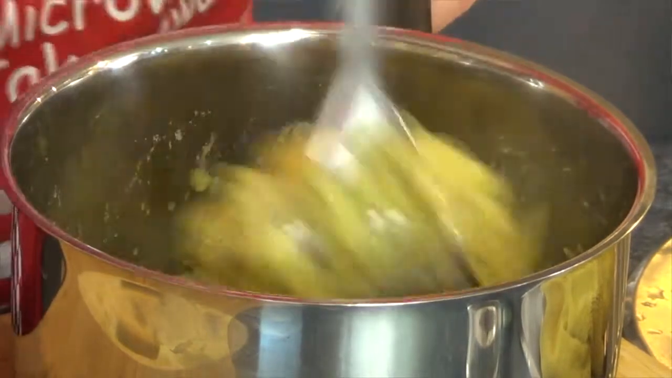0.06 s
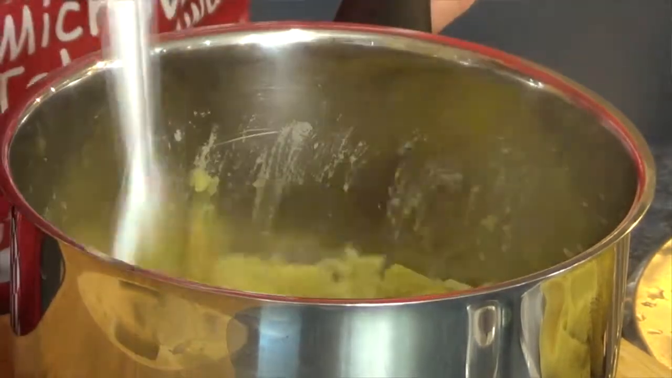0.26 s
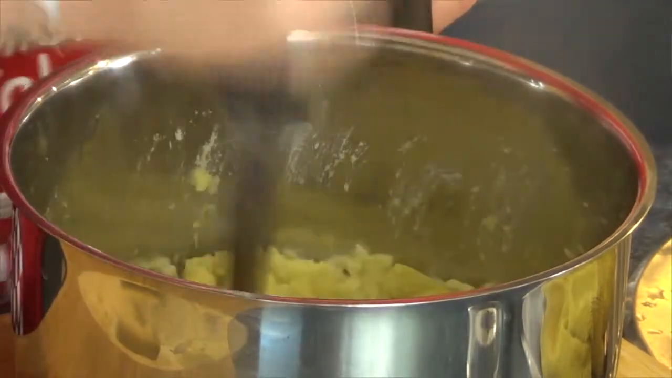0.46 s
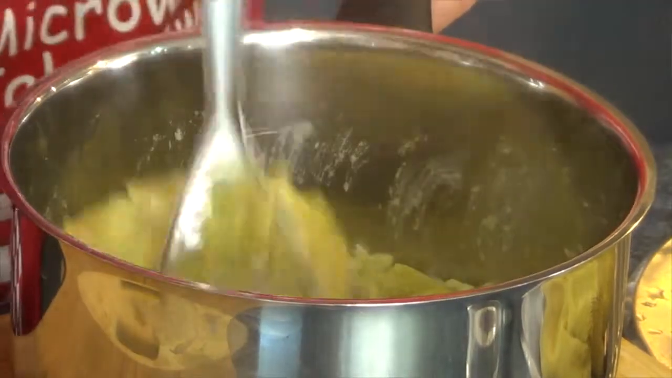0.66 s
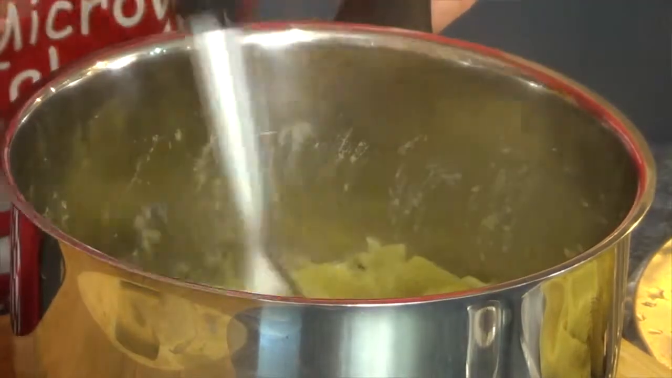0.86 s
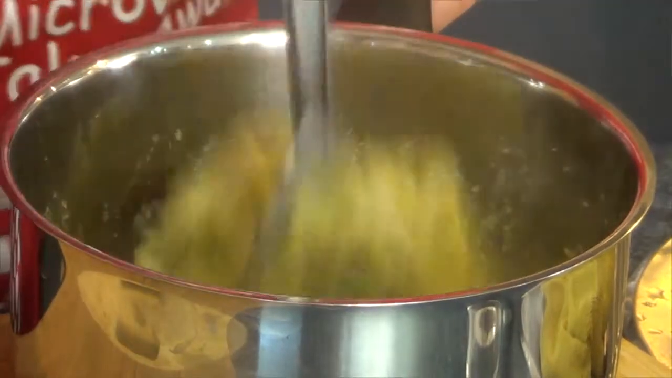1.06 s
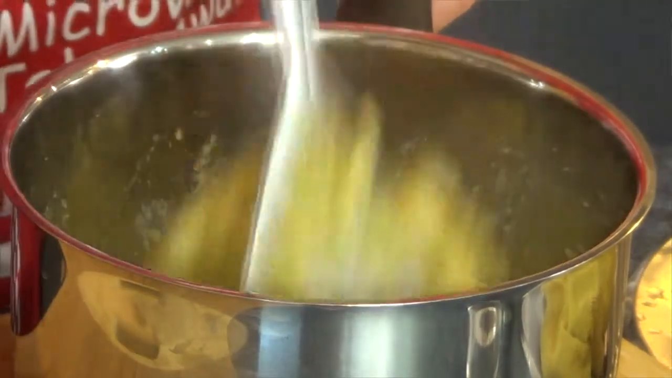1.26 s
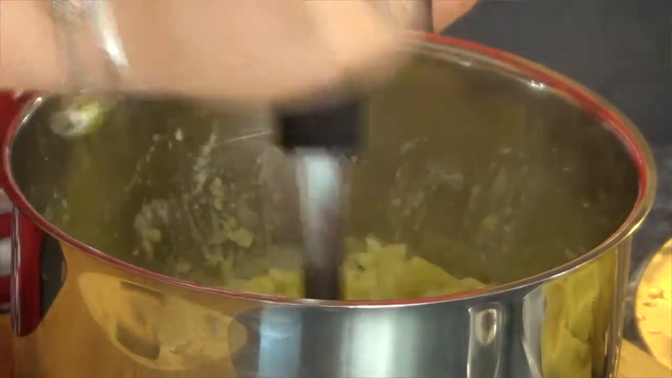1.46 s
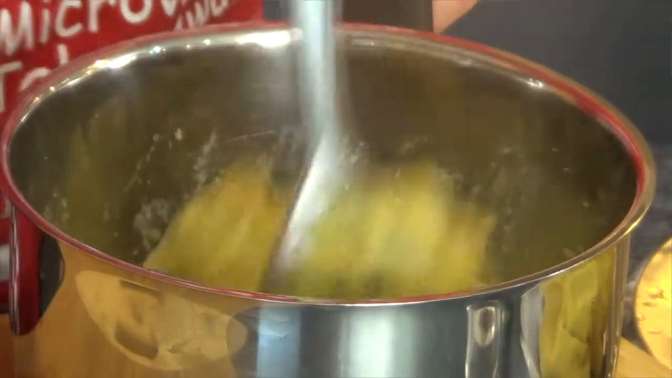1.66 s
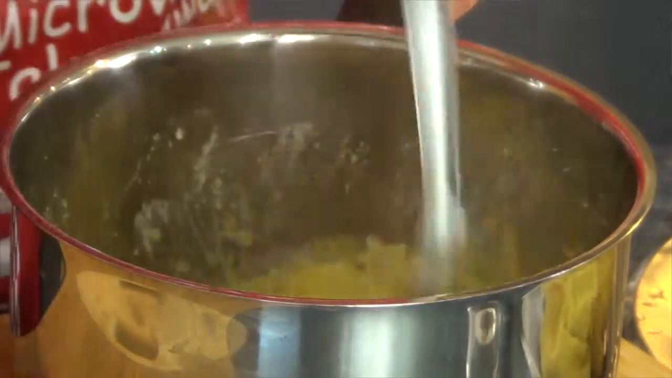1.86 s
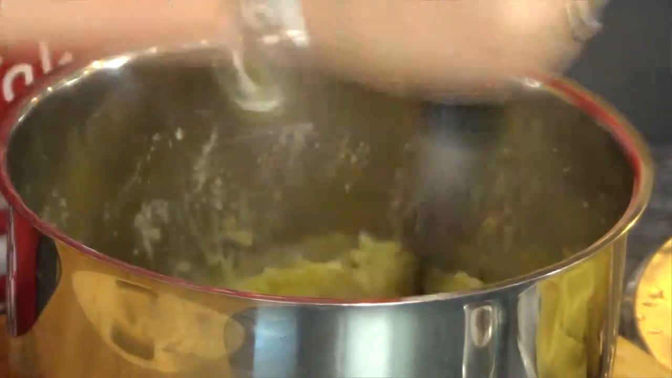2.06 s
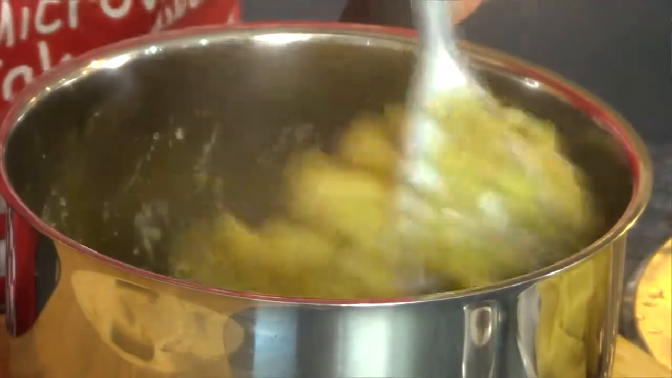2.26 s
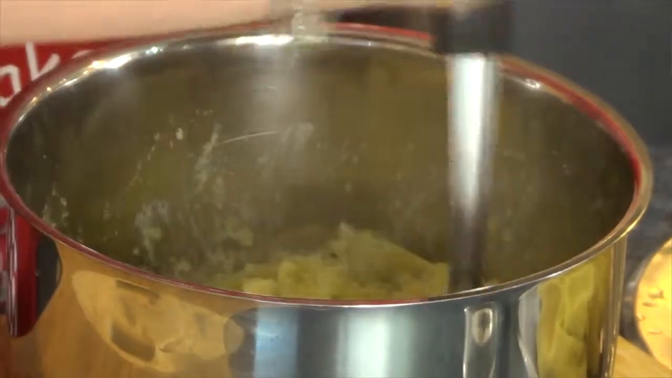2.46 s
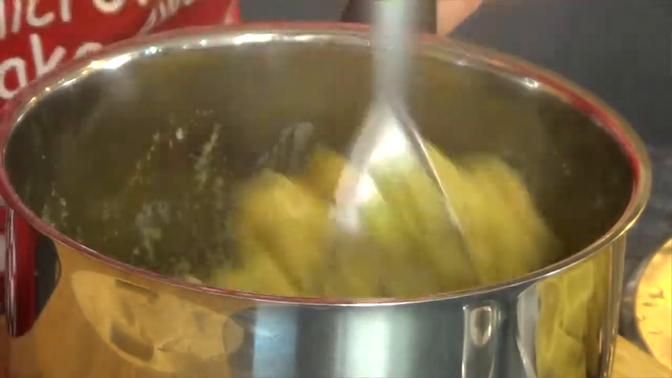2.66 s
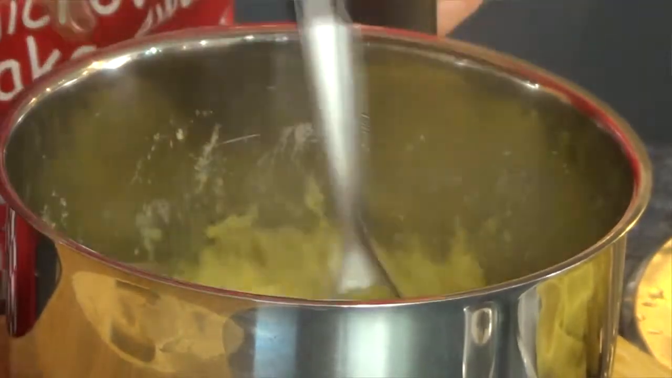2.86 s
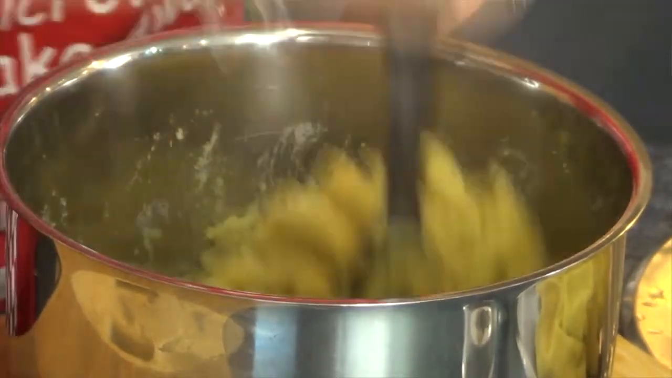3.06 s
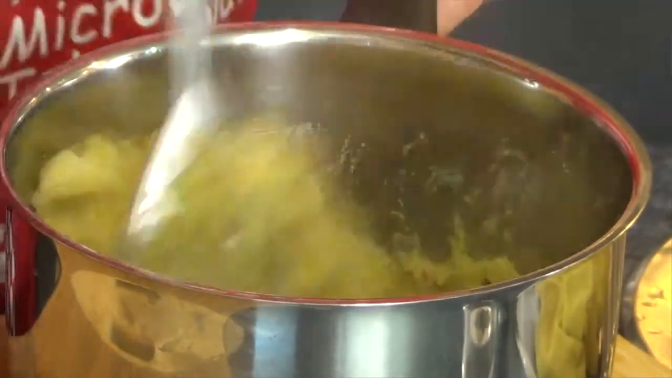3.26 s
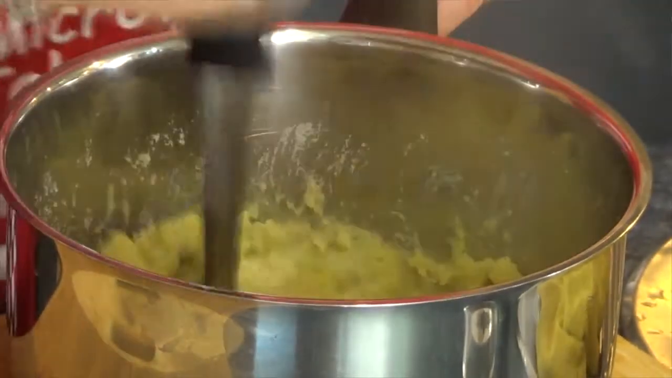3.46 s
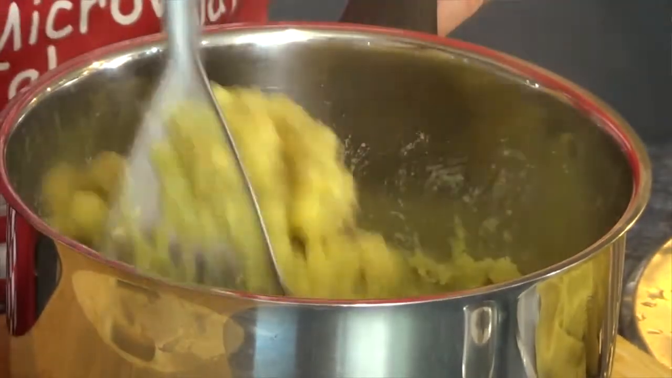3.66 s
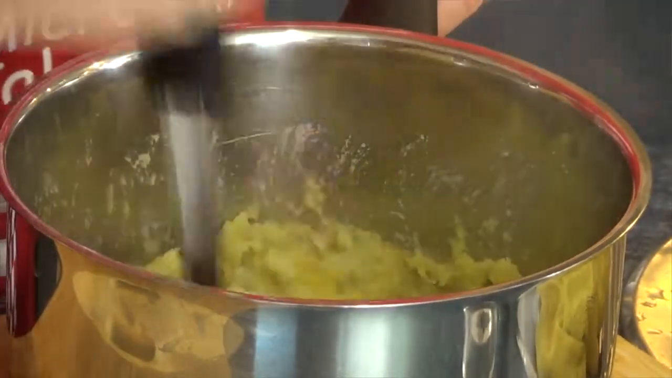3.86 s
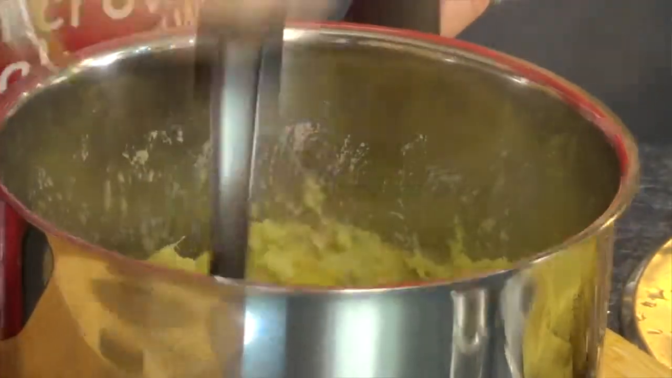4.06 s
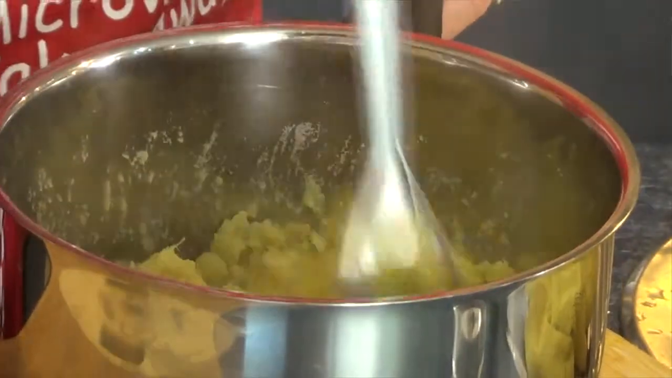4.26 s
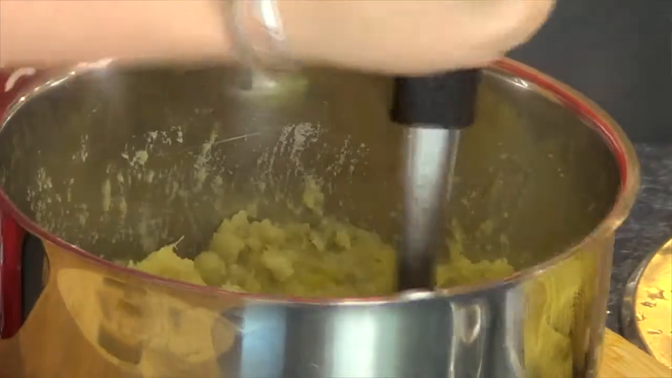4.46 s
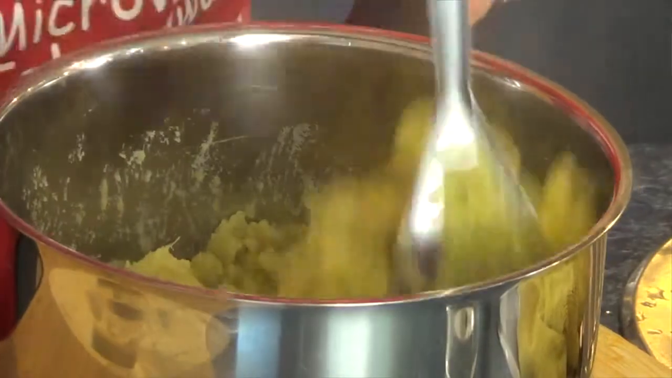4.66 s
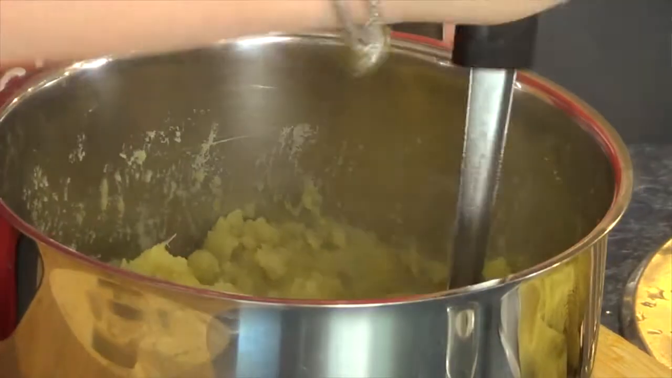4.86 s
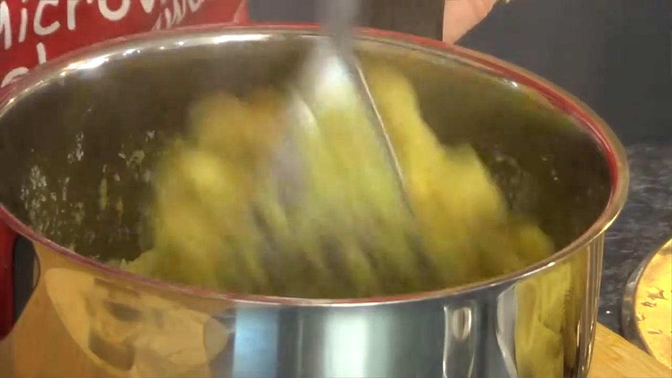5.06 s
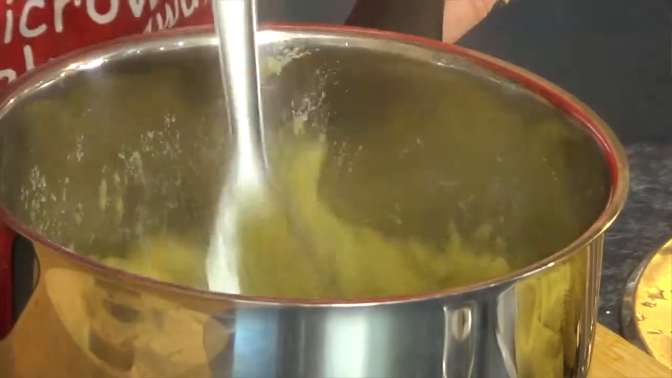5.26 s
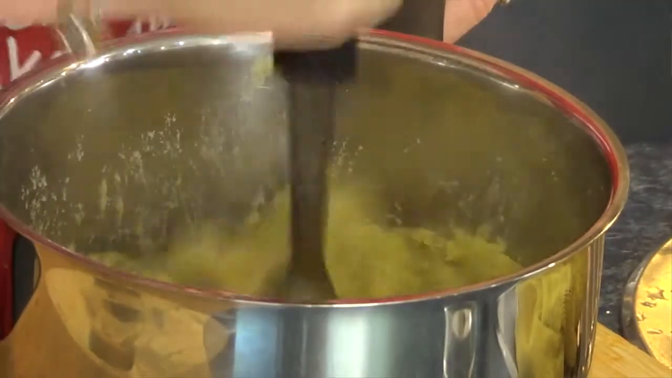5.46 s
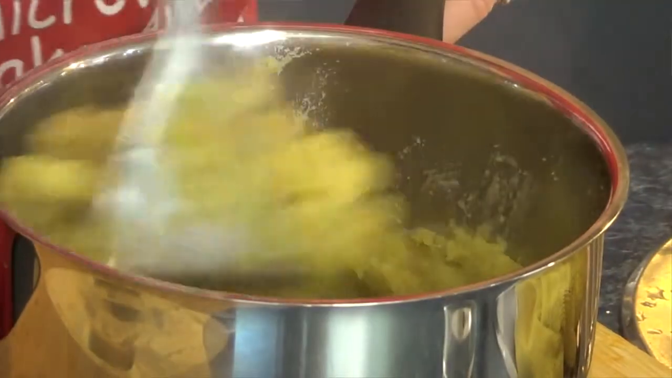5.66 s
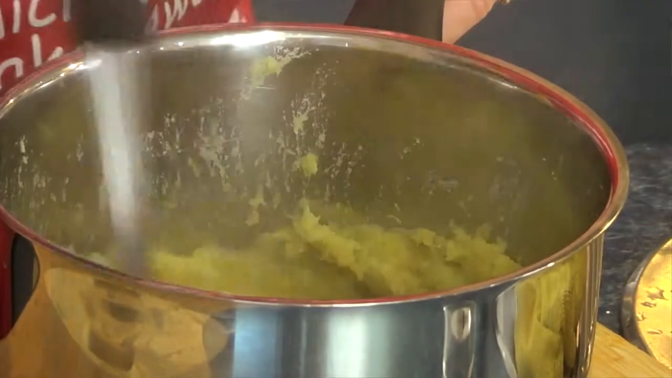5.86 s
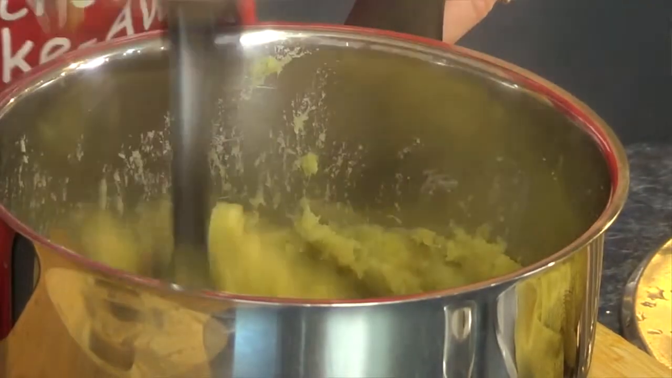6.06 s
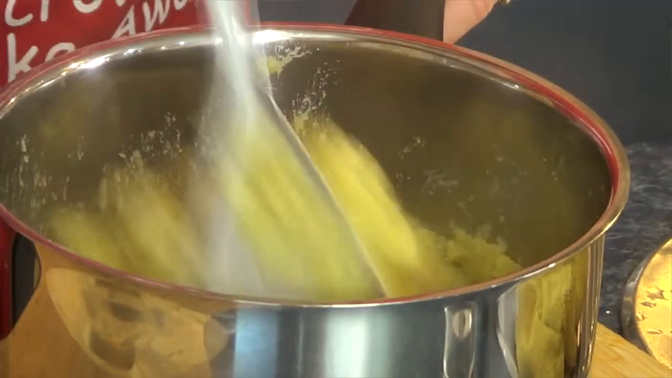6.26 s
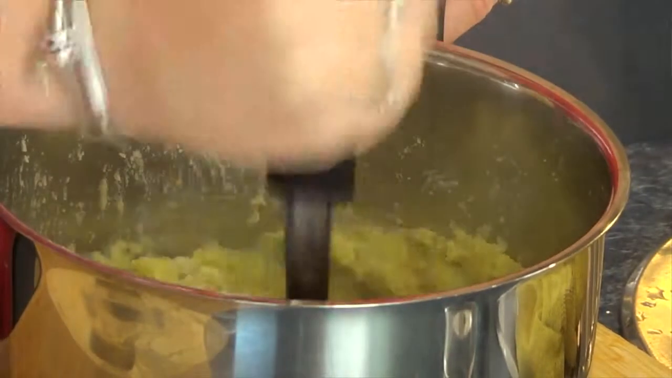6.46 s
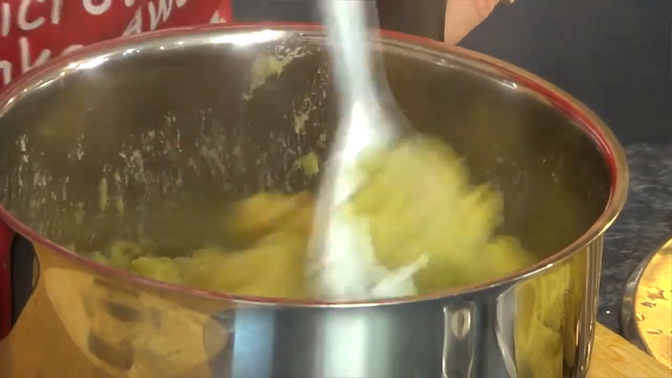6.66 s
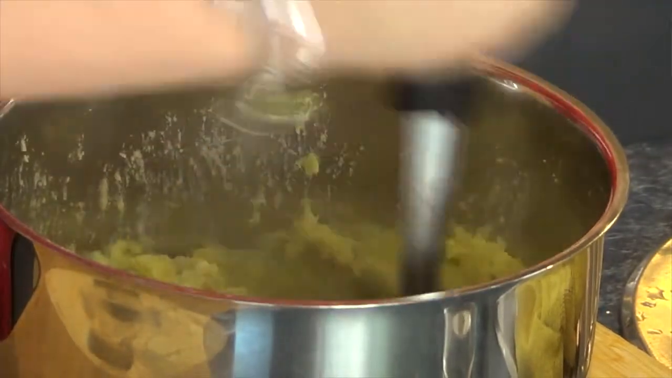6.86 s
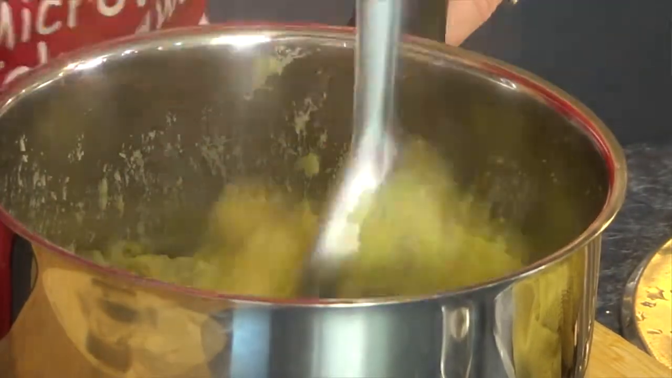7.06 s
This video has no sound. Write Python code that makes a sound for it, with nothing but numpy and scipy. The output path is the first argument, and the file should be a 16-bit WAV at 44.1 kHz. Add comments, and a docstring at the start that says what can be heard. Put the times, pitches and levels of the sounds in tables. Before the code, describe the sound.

A metal masher squishes soft boiled potato in a steel pot with wet slaps, crackles and occasional dull knocks.

```python
"""A metal masher works boiled sweet potato in a steel pot, about two strokes a second, close to one mic.
Each stroke slaps a lump onto the mash, presses it through the plate with wet crackles and air pops,
then peels off. Here and there, hardest just past midway, the masher scrapes the mash together and
knocks the pot, which thuds on its board. A small, hard kitchen rings over quiet air and a faint hum."""
import sys
import numpy as np
from scipy import signal
from scipy.fft import rfft, irfft, next_fast_len
from scipy.io import wavfile
from scipy.ndimage import uniform_filter1d

SR = 44100
rng = np.random.default_rng(int(sys.argv[2]) if len(sys.argv) > 2 else 0)


def put_to_file(sound):
    """Save the sound as 16-bit audio at rate SR, in the file named by the first command-line argument."""
    columns = np.atleast_2d(sound).T  # one column per channel
    safe = np.clip(columns, -1, 1)
    whole_steps = np.round(safe * 32767)
    wavfile.write(sys.argv[1], SR, whole_steps.astype(np.int16))


N = 313110
T = np.arange(SR * 2 // 5) / SR  # the life of one hit

# Short sideways scrapes through the mash: t/s, gurgle/dB, crackle/dB, fizz/dB
SCRAPES = [(0.005, -45.5, -68, -60), (0.055, -53, -61, -53.5), (4.424, -57, -47, -50),
           (4.608, -39, -50.5, -53), (4.865, -51.5, -51, -53), (5.048, -38.5, -51.5, -53),
           (5.354, -41, -54, -55), (5.53, -48.5, -59, -70), (6.713, -64, -69, -57.5),
           (7.095, -41.5, -51, -58.5)]
# A lump lands on the mash: t/s, plop level/dB, plop f/Hz, splash level/dB
SLAPS = [(0.324, -27, 1020, -34), (0.8647, -28.5, 945, -32), (1.358, -25.5, 634, -32.5),
         (1.8927, -28, 657, -38), (2.4021, -28, 1166, -35.5), (2.905, -37, 1520, -37),
         (3.4035, -29.5, 914, -36), (3.8434, -28, 770, -36.5), (3.9056, -32, 860, -33),
         (4.2684, -28.5, 800, -30.5), (4.7193, -23.5, 697, -27.5), (5.8363, -24.5, 680, -35),
         (6.3502, -29.5, 1880, -37.5), (6.3788, -30, 696, -34), (6.7887, -33.5, 750, -38.5)]
# Wet faces mostly close faster as the mash softens: t/s, closing time/s
CLOSING_TIMES = [(0.3, 0.0062), (2.4, 0.0055), (4.3, 0.00313), (6.8, 0.004)]
# The plate presses down: full force t/s, gurgle/dB, crackle/dB, fizz/dB, wait until peel/s, peel/dB
PRESSES = [(0.392, -48, -45.5, -49, .24, -56), (0.945, -50, -49.5, -58.5, .165, -55),
           (1.455, -45, -45, -56, 0.2, -55.5), (2.0, -49.5, -51, -56.5, 0.16, -52.5),
           (2.48, -47.5, -47, -55, .16, -55.5), (3.045, -44, -55.5, -65, 0.073, -61.5),
           (3.46, -42, -49, -59, 0.18, -58.5), (3.943, -41, -48.5, -55, .18, -59.5),
           (5.417, -45, -49.5, -63, .185, -53.5), (5.91, -42, -43.5, -49, 0.23, -54.5),
           (6.452, -43, -43.5, -46.5, 0.14, -55), (6.925, -48, -51, -53, 0.16, -61)]
# The plate knocks the pot: t/s, level/dB, f/Hz, click level/dB (both levels before trim)
KNOCKS = [(0.437, -25.5, 654, -38.5), (0.501, -26.5, 610, -40.5), (1.523, -23.5, 706, -32),
          (1.6154, -33, 397, -45.5), (2.187, -31, 609, -57), (4.209, -33.5, 382, -57),
          (4.2278, -18.5, 393, -48), (4.418, -30.5, 556, -48), (4.6648, -15, 600, -25.5),
          (4.685, -17, 400, -54), (5.0905, -18, 430, -33.5), (6.084, -37, 676, -43.5),
          (6.65, -33, 680, -55)]
# Large air pockets burst: t/s, level/dB, f/Hz, spray level/dB
POPS = [(0.4372, -40, 3600, -38.5), (1.094, -49, 5570, -46), (1.442, -36, 1040, -42),
        (1.5, -31.5, 2430, -43), (2.462, -36.5, 1180, -36), (2.509, -37.5, 2260, -62),
        (2.65, -45, 1240, -50), (2.9797, -36, 1220, -48), (3.967, -29.5, 1380, -45), (4.044, -45, 900, -44),
        (4.0855, -54, 900, -50.5), (4.1478, -43, 2560, -47), (5.2933, -38.5, 1360, -70),
        (5.4, -34.5, 2300, -52), (5.436, -41, 2840, -60), (5.937, -36, 1900, -60), (5.9563, -35, 1330, -62),
        (6.442, -34.5, 2240, -39), (6.9265, -37.5, 2720, -44)]
# The pot is pressed onto its board: t/s, level/dB before trim
THUDS = [(0.523, -39), (0.559, -40), (1.36, -43.5), (2.185, -47), (2.984, -39), (3.478, -39), (4.225, -33),
         (4.669, -24), (4.717, -36.5), (5.092, -31), (5.347, -42.5), (5.449, -41), (6.647, -42)]
# Hum of a distant appliance: f/Hz, level/dB
HUM = [(118.4, -63.5), (155, -69.5), (452, -67)]
# Resonances of the open pot: f/Hz, width/Hz, level/dB (halved in use)
POT_MODES = [(610, 51, -5), (860, 70, -6), (1067, 12, 8), (1251, 59, 9.5), (1361, 48, 13), (1814, 54, -3),
             (2100, 89, 6), (2790, 52, -42), (3400, 105, 4), (4660, 720, -13)]
# The masher's steel plate, damped by mash: f/Hz, relative level/dB
PLATE_MODES = [(2900, 0.5), (3280, -7), (4250, 3), (5800, -8), (7560, -8)]
# Standing waves of the kitchen: f/Hz, level/dB
ROOM_MODES = [(76, -16), (155, 8), (308, -26), (430, 10)]
# Reverb of the kitchen: f/Hz, t60/s
ROOM_DECAY = [(100, 1), (260, 0.49), (700, 0.43), (1840, 0.44), (4850, 0.33), (12800, 0.35)]
# EQ curves, each: f/Hz, relative level/dB
AIR_EQ = [(12, -26), (20, -16), (63, 0.5), (150, -7.5), (216, -3), (293, -14.5), (319, -8), (459, -8.5),
          (642, -14), (1910, -23), (3440, -28.5), (3740, -29.5), (6720, -28), (12800, -35), (16000, -34)]  # low room air
GURGLE_EQ = [(50, -34), (150, 9.5), (260, -1.5), (430, 2.5), (700, -0.5), (1100, -22.5), (2500, -24),
             (8000, -44)]  # thick, flowing mash
SPLASH_EQ = [(300, -31.5), (1000, 4.5), (1800, -8), (3000, 2.5), (3700, -5.5), (4400, -6), (6500, -13.5),
             (10000, -29), (16000, -14)]  # wet midrange bite
HOLLOW_EQ = [(100, -8), (300, -18.5), (450, -12.5), (680, 4), (1250, -14.5), (1800, -12.5), (4000, -44),
             (12000, -104)]  # cupped tone of plops and knocks
BODY_EQ = [(40, -7), (100, -20), (150, 8), (220, -9.5), (320, -4.5), (430, 5), (700, -28.5), (2000, -62.5)]  # low weight of a hit
SPRAY_EQ = [(1500, -79), (4000, -1), (7500, 3), (10000, -0.5), (15500, -3.5)]  # fine, bright droplets
THUD_EQ = [(20, -46), (45, -15), (75, 0), (120, -14.5), (200, -6.5), (500, -83.5)]  # boom of the board
HISS_EQ = [(100, 7.5), (600, -5.5), (2500, -4), (5000, -4), (15000, -7)]  # mic self-noise

LEAD_S = .12  # run-up to the peak of a swell


def amp(db):
    """Decibels to gain."""
    return 10 ** (np.asarray(db) / 20)


def unit(x):
    """Scale to rms 1."""
    return x / np.sqrt(np.mean(x ** 2) + 1e-20)


def along(points, hz):
    """Read a breakpoint curve on a log frequency axis."""
    f, values = np.transpose(points)
    return np.interp(np.log(hz + 1), np.log(f), values)


def eq(x, curve):
    """Minimum-phase EQ, so attacks have no pre-ring."""
    m = next_fast_len(len(x) + 4096, True)
    gain = amp(along(curve, np.fft.rfftfreq(m, 1 / SR)))
    cepstrum = irfft(np.log(gain), m)
    cepstrum[1:m // 2] *= 2
    cepstrum[m // 2 + 1:] = 0
    return irfft(rfft(x, m) * np.exp(rfft(cepstrum)), m)[:len(x)]


def add(track, s, x):
    """Mix x into the track from time s."""
    start = round(s * SR)
    x = x[max(-start, 0):]
    part = track[max(start, 0):][:len(x)]
    part += x[:len(part)]


def at_level(x, db, window=256):
    """Set the rms level of the loudest window of samples."""
    return x * amp(db) / np.sqrt(uniform_filter1d(x ** 2, window).max() + 1e-20)


def burst(t60, hold=0):
    """Noise that holds, then dies away."""
    return rng.standard_normal(len(T)) * amp(-60 * np.maximum(T - hold, 0) / t60)


def ring(hz, t60, delay=0):
    """A damped resonance."""
    t = np.maximum(T - delay, 0)
    return np.sin(2 * np.pi * hz * t) * amp(-60 * t / t60)


def room_tone():
    """The bed: quiet air and a distant appliance's hum."""
    t = np.arange(N) / SR
    hum = sum(amp(db) * unit(np.sin(2 * np.pi * hz * t + rng.uniform(0, 2 * np.pi))) for hz, db in HUM)
    return hum + amp(-54.5) * unit(eq(rng.standard_normal(N), AIR_EQ))


def squeezes():
    """Scrapes nudge the mash; presses force it through the plate, which peels off with a sticky fizz."""
    out = np.zeros(N)
    flow, tearing = swell(rise_s=.035, fall_s=.087), swell(rise_s=.035, fall_s=.039)
    peel, scrape = swell(rise_s=.041), swell(rise_s=.025)
    for s, gurgle_db, crackle_db, fizz_db, wait_s, peel_db in PRESSES:
        add(out, s - LEAD_S, ooze(flow, tearing, gurgle_db, crackle_db, fizz_db))
        lift = ooze(peel, peel, gurgle_db=peel_db - 2, crackle_db=peel_db - 8, fizz_db=peel_db)
        add(out, s + wait_s - LEAD_S, lift)
    for s, gurgle_db, crackle_db, fizz_db in SCRAPES:
        add(out, s - LEAD_S, ooze(scrape, scrape, gurgle_db, crackle_db, fizz_db))
    return out


def swell(rise_s, fall_s=None):
    """A bell of force peaking at LEAD_S, with an exponential release if a fall is given."""
    t = T - LEAD_S
    bell = np.exp(-(t / rise_s) ** 2)
    return bell if fall_s is None else np.where(t < 0, bell, np.exp(-np.abs(t) / fall_s))


def ooze(flow, tearing, gurgle_db, crackle_db, fizz_db):
    """Mash gurgles as it flows; its tearing films crackle, rush and fizz."""
    gurgle = in_pot(eq(rng.standard_normal(len(T)) * flow, GURGLE_EQ), ring_db=-31)
    crackle = bubbles(tearing, per_s=2400, hz=2160, pitch_spread=0.56, cycles=7, spread_db=8.0)
    # The rush is bubbles too many to tell apart.
    rush = in_pot(eq(rng.standard_normal(len(T)) * tearing, SPLASH_EQ), ring_db=-1)
    fizz = bubbles(tearing, per_s=3500, hz=11600, pitch_spread=0.42, cycles=10.5, spread_db=8.5)
    layers = (gurgle, gurgle_db), (crackle, crackle_db), (rush, crackle_db - 6), (fizz, fizz_db)
    return echoed(sum(at_level(layer, db, window=1536) for layer, db in layers), early_db=-7)


def in_pot(x, ring_db):
    """Blend in the ring of the open pot; ring_db is the send level."""
    m = next_fast_len(len(x) + 4096, True)
    f = np.fft.rfftfreq(m, 1 / SR)
    modes = sum(amp(db / 2) * 1j * f * width / (hz * hz - f * f + 1j * f * width)
                for hz, width, db in POT_MODES)
    return irfft(rfft(x, m) * (1 + amp(ring_db) * modes), m)[:len(x)]


def bubbles(envelope, per_s, hz, pitch_spread, cycles, spread_db, size=400):
    """Tiny bubbles burst at random under the envelope, each a pitched grain; a few are much louder."""
    onsets = np.flatnonzero((rng.random(len(T)) < per_s / SR) & (envelope > .02))
    pitch = np.minimum(hz * np.exp(pitch_spread * rng.standard_normal((len(onsets), 1))), SR * .45)
    accent_db = spread_db * np.minimum(rng.exponential(size=len(onsets)), 3)
    strength = envelope[onsets] * amp(accent_db) * rng.choice([-1, 1], len(onsets))
    turns = pitch * np.arange(size) / SR
    grains = strength[:, None] * np.sin(2 * np.pi * turns) * amp(-60 * turns / cycles)
    positions = onsets[:, None] + np.arange(size)
    return np.bincount(positions.ravel(), grains.ravel(), len(T) + size)[:len(T)]


def echoed(x, early_db):
    """Add early reflections from the pot wall and the counter."""
    early = (burst(t60=0.11) * np.minimum(T / 0.0032, 1))[:SR // 5]
    return x + signal.fftconvolve(x, amp(early_db) * early / np.linalg.norm(early))[:len(x)]


def kitchen(x, blur=0.08, size=512):
    """The room stores each band's energy and lets it die as diffuse noise; low standing waves ring on."""
    hz, t, spectrum = signal.stft(x, SR, nperseg=size)
    near = np.exp(-(np.log((hz[:, None] + 1) / (hz + 1)) / blur) ** 2)  # nearby bands share energy
    fed = (near / near.sum(axis=0)) @ np.abs(spectrum) ** 2
    kept = amp(-60 * t[1] / along(ROOM_DECAY, hz)) ** 2  # share of energy left after one frame
    stored = np.array([signal.lfilter([0, 0, 1 - k], [1, -k], band) for k, band in zip(kept, fed)])
    noise = signal.stft(rng.standard_normal(N), nperseg=size)[2]
    tail = signal.istft(noise * np.sqrt(stored / np.mean(np.abs(noise) ** 2)), nperseg=size)[1][:N]
    modes = [(ring(f, t60=1.0), db) for f, db in ROOM_MODES]
    standing = sum(amp(db) * mode / np.abs(mode).sum() for mode, db in modes)
    return eq(tail, [(40, -10.0), (130, -1.5)]) + signal.fftconvolve(x, standing)[:N]


def slaps():
    """Wet faces close in a few milliseconds of spatter; the trapped air then plops out."""
    out = np.zeros(N)
    wet_attack = np.minimum(T / 0.00088 + 0.12, 1)  # the first drops come before the rest
    for s, db, hz, splash_db in SLAPS:
        closing = np.interp(s, *np.transpose(CLOSING_TIMES))
        attack = np.minimum(T / closing + 0.4, 1)
        note = ring(hz, t60=0.037, delay=0.737 * closing)
        hollow = eq(attack * spatter(closing, t60=0.025, fizzle_db=-0.5), HOLLOW_EQ)
        plop = in_pot(at_level(note, -1) + at_level(hollow, -0.28), ring_db=8)
        thump = eq(attack * burst(t60=0.11, hold=closing), BODY_EQ)
        splash = eq(wet_attack * spatter(closing, t60=0.013, fizzle_db=-16.5), SPLASH_EQ)
        spray = eq(wet_attack * spatter(closing, t60=0.02, fizzle_db=-18), SPRAY_EQ)
        hit = at_level(plop, db) + at_level(thump, -36)
        hit += at_level(in_pot(splash, ring_db=-0.5), splash_db)
        hit += at_level(spray, splash_db - 3) + plate_ring(splash_db)
        add(out, s, echoed(hit, early_db=-7.5))
    return out


def spatter(closing, t60, fizzle_db):
    """Noise while two wet faces close, then a weaker fizzle as the contact spreads."""
    return burst(t60, hold=closing) + amp(fizzle_db) * burst(t60=0.11)


def plate_ring(contact_db):
    """The steel plate pings under the contact that excites it, favouring other modes each time."""
    scatter = rng.standard_normal((len(PLATE_MODES), 2))
    modes = sum(amp(db + 3 * louder) * ring(hz * (1 + .015 * detune), t60=0.022)
                for (hz, db), (louder, detune) in zip(PLATE_MODES, scatter))
    return at_level(modes, contact_db - 10)


def knocks(cushion_s=.0022, click_lag_s=.0012):
    """The plate pushes the pot through a cushion of mash, then strikes: a dull note and a click."""
    out = np.zeros(N)
    attack = np.minimum(T / 0.0023 + 0.42, 1)
    for s, db, hz, click_db in KNOCKS:
        hollow = eq(snap(t60=0.036, scatter_db=1.5), HOLLOW_EQ)
        note = at_level(ring(hz, t60=0.027), -0.4) + at_level(hollow, 0.28)
        strike = at_level(in_pot(note * attack, ring_db=-8.5), db - 3.5)
        click = at_level(eq(snap(t60=0.005, scatter_db=14), SPLASH_EQ), click_db + .5)
        click += plate_ring(click_db)
        push = at_level(eq(snap(t60=0.048, scatter_db=6.5), BODY_EQ), db - 7)
        add(out, s, echoed(strike, early_db=-4.5))
        add(out, s + click_lag_s, echoed(click, early_db=-10))  # the mash gives way: steel on steel
        add(out, s - cushion_s, echoed(push, early_db=-1.5))
    return out


def snap(t60, scatter_db):
    """One sharp transient with a short scatter behind it."""
    scatter = burst(t60)
    return (T == 0) + amp(scatter_db) * scatter / np.linalg.norm(scatter)


def pops():
    """Air pockets burst with a short note and a fine spray."""
    out = np.zeros(N)
    for s, db, hz, spray_db in list(POPS) + small_pops():
        crack = eq(snap(t60=0.016, scatter_db=31.0), SPLASH_EQ)
        note = at_level(ring(hz, t60=0.0043), 2.0) + at_level(crack, -0.94)
        spray = eq(burst(t60=0.024), SPRAY_EQ)
        add(out, s, echoed(at_level(note, db) + at_level(spray, spray_db), early_db=-4))
    return out


def small_pops(per_press=2, span_s=.11, db=-49, centre_hz=1600, spray_db=-52):
    """Cues for the small air pockets each press frees, at random times and pitches."""
    chance = rng.random((len(PRESSES), per_press, 2))
    return [(press[0] + span_s * late, db, centre_hz * 2 ** (2 * high - 1), spray_db)
            for press, draws in zip(PRESSES, chance) for late, high in draws]


def thuds():
    """The board under the pot gives a low, short boom."""
    out = np.zeros(N)
    for s, db in THUDS:
        push = snap(t60=0.12, scatter_db=5.5) + amp(-8) * snap(t60=0.19, scatter_db=8)
        add(out, s, at_level(eq(push, THUD_EQ), db + 3.5))
    return out


def scene():
    """A centred mono mix; slaps, knocks, pops and squeezes feed the reverb, the thuds stay dry."""
    slap, knock, pop, squeeze = slaps(), knocks(), pops(), squeezes()
    reverb = kitchen(amp(-4.5) * slap + amp(-5.0) * knock + amp(-11.0) * pop + amp(-9.5) * squeeze)
    mono = slap + knock + pop + squeeze + thuds() + reverb + room_tone()
    return np.array([mono, mono])


def record(dry):
    """Each channel gains its own faint hiss, then a brick-wall cut at 16 kHz."""
    hiss = np.array([unit(eq(rng.standard_normal(N), HISS_EQ)) for _ in dry])
    m = next_fast_len(N + 4096)
    passband = np.fft.rfftfreq(m, 1 / SR) < 16000
    return irfft(rfft(dry + amp(-71.5) * hiss, m) * passband, m)[:, :N]


dry = scene()
out = record(dry)
put_to_file(out)
```